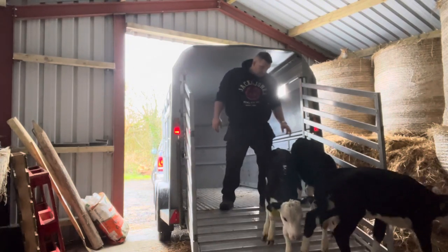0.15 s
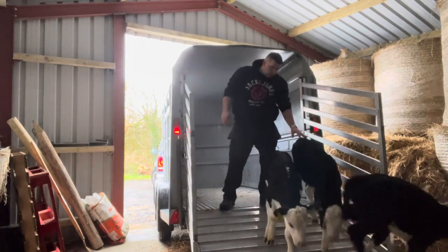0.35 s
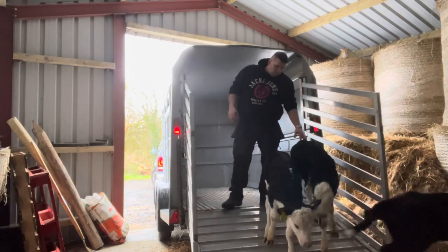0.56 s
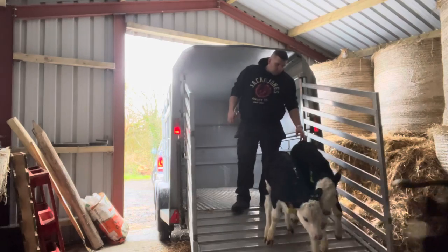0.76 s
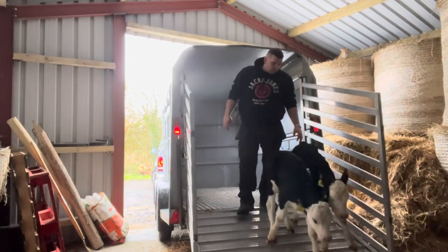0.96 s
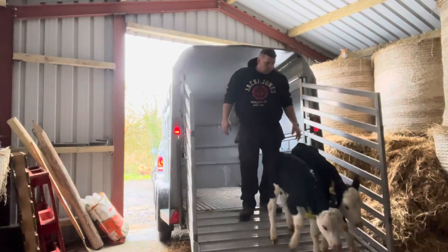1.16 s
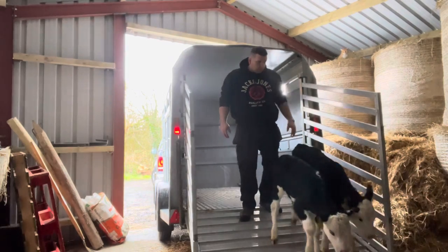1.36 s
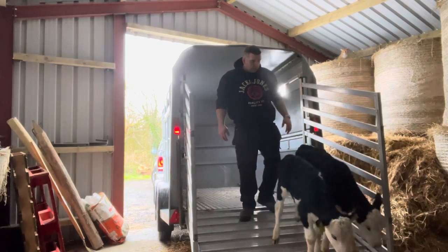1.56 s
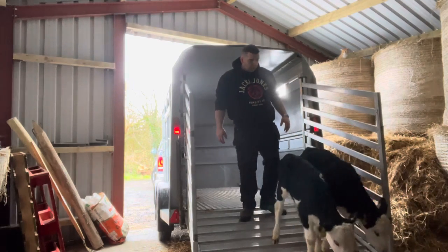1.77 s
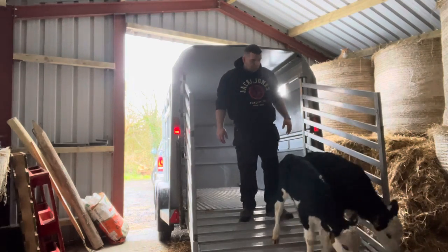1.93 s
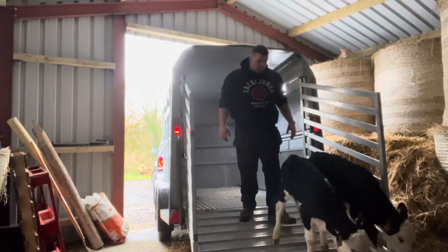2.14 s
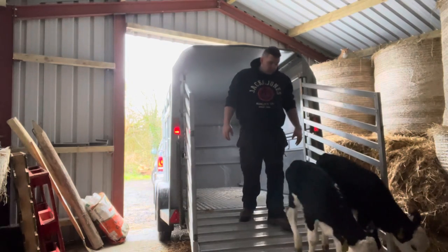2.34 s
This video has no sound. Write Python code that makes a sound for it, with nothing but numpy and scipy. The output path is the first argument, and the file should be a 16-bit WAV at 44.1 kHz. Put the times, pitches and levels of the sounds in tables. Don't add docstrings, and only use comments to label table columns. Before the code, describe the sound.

Close up in a barn, calf hooves knock and rattle loose sheet metal over booming floor thuds, with small metallic squeaks; the steps thin out, a small bird trills, then a sharp blow and lighter knocks follow.

```python
import sys
import numpy as np
from scipy import signal
from scipy.fft import rfft, irfft, next_fast_len
from scipy.io import wavfile
from scipy.ndimage import map_coordinates

SR = 44100
rng = np.random.default_rng(int(sys.argv[2]) if len(sys.argv) > 2 else 0)


def unload_wav(signal):
    wavfile.write(
        sys.argv[1],
        SR,
        np.round(np.clip(np.atleast_2d(signal).T, -1, 1) * 32767).astype(np.int16),
    )


def ratio(d):
    e = np.asarray(d, float) / 20
    return 10 ** e


N = 110250


def unit(x):
    return x / np.sqrt(np.mean(x ** 2) + 1e-20)


def along(points, hz):
    point_hz, value = np.transpose(points)
    return np.interp(np.log(hz + 1), np.log(point_hz + 1), value)


def filtered(x, response):
    size = next_fast_len(x.shape[-1] + 4096)
    spectrum = rfft(x, size) * response(np.fft.rfftfreq(size, 1 / SR))
    return irfft(spectrum, size)[..., :x.shape[-1]]


def noise(count):
    return rng.standard_normal((2, count))


def add(track, s, sound):
    part = track[:, round(s * SR):][:, :sound.shape[-1]]
    part += sound[..., :part.shape[1]]


def wobble(rate, count=N):
    knots = rng.standard_normal(int(count * rate / SR) + 4)
    return map_coordinates(knots, [np.arange(count) * rate / SR])


def dying(t60_of, gain_of_hz, count=SR // 2):
    hz, t, z = signal.stft(noise(count), SR, nperseg=256)
    decay = ratio(-60 * t / np.maximum(t60_of(hz), .01)[:, None])
    gain = unit(gain_of_hz(hz))[:, None] * decay
    return signal.istft(z * gain, SR, nperseg=256)[1][:, :count]


def rings(hz, db, t60, t):
    turn = 2 * np.pi * (hz[:, None] * t + rng.random((2, len(hz), 1)))
    return np.sum(ratio(db[:, None] - 60 * t / t60[:, None]) * np.sin(turn), axis=1)


def band(hz, centre_hz, width_hz):
    return 1 / (1 + (2 * (hz - centre_hz) / width_hz) ** 2)


def background():
    # start_s, level_db
    stir = [
        (0, -12),
        (.15, -9),
        (.4, 5),
        (1.201, 3),
        (1.7, 4.5),
        (1.948, 6.5),
        (2.248, 2.5),
        (2.398, -20.5),
        (2.5, 6),
    ]
    # pitch_hz, level_db
    chassis = [(20, -30), (35, -12), (73, 0), (100, -14), (135, -8), (200, -40)]
    # pitch_hz, level_db
    straw = [(1500, -0.5), (3000, -6), (6000, -9), (11500, -13.5), (14000, -50)]
    # pitch_hz, level_db
    air = [(30, -16.5), (290, 2), (1000, -7), (4000, -34.5), (7400, -21), (8300, -2), (11000, -22),
           (13300, -30)]
    stir_db = np.interp(np.arange(N) / SR, *np.transpose(stir))

    def hiss(points):
        return unit(filtered(noise(N), lambda f: ratio(along(points, f))))

    grain_db = wobble(30) + 2 * wobble(300)
    rustle = hiss(straw) * ratio(-55 + 0.73 * stir_db + grain_db)
    rumble = hiss(chassis) * ratio(-46.5 + stir_db)
    return rumble + rustle + ratio(-54) * hiss(air)


def bird():
    # start_s, length_s, from_hz, to_hz, level_db
    notes_sung = [
        (1.403, .012, 4200, 4450, -53),
        (1.372, .025, 2950, 3300, -55),
        (1.536, .022, 3100, 3800, -51),
        (1.552, .01, 4100, 4600, -58),
        (1.63, .065, 3350, 3750, -53),
        (1.64, .04, 4000, 4400, -59),
        (1.67, .045, 4450, 4200, -59),
        (1.69, .05, 3750, 3100, -52),
        (1.715, .075, 3400, 2300, -46),
        (1.748, .025, 4650, 4300, -59),
    ]
    trill_hz = 188
    out = np.zeros((1, N))
    for s, length, from_hz, to_hz, db in notes_sung:
        t = np.arange(round(length * SR)) / SR
        pitch = from_hz + (to_hz - from_hz) * t / length
        tone = np.sin(2 * np.pi * np.cumsum(pitch) / SR)
        chop = np.cos(np.pi * trill_hz * t) ** 2 if length > .045 else 1
        swell = 2 * np.sqrt(np.sin(np.pi * t / length))
        add(out, s, ratio(db) * swell * chop * tone * (1 + .5 * wobble(700, count=len(t))))
    return out


def scuffs():
    # start_s, length_s, level_db
    slides = [
        (0.178, 0.036, -51),
        (1.753, 0.053, -36),
        (1.905, 0.048, -35.5),
    ]
    # pitch_hz, level_db
    hiss_colour = [(1500, -1.5), (4000, -12), (8000, 0.5), (11500, 2), (14500, -2.5)]
    # pitch_hz, width_hz, level_db
    squeal = [(5500, 530, -17), (11550, 700, -15)]
    squeal_s, squeal_len_s, squeal_t60_s = .442, .014, .2
    out, t = np.zeros((2, N)), np.arange(SR // 4) / SR
    for s, length, db in slides:
        hiss = unit(filtered(noise(len(t)), lambda f: ratio(along(hiss_colour, f))))
        add(out, s, ratio(db) * hiss * np.sin(np.pi * np.minimum(t / length, 1) ** 0.47))
    ring_on = 0.32 * ratio(-60 * t / squeal_t60_s)
    held = np.minimum(t / 0.0016, 1) * np.where(t < squeal_len_s, 1, ring_on)
    for hz, width_hz, db in squeal:
        shriek = unit(filtered(noise(len(t)), lambda f: band(f, hz, width_hz)))
        add(out, squeal_s, ratio(db) * held * shriek)
    return out


def clinks():
    # start_s, peak_db, pitch_hz
    pin = [(0.4519, -11, 3590), (0.5816, -22, 4030), (0.6502, -15.5, 4500), (0.7517, -16.5, 4230),
           (0.83, -12.5, 4350), (0.8874, -19, 3744), (0.901, -19, 4270), (0.761, -27, 4480),
           (0.9611, -13, 4160), (1.0336, -26, 3950), (1.0983, -19.5, 4470), (1.1862, -23, 4210)]
    skid_s, glide, roughness = .009, .16, .8
    out, t = np.zeros((2, N)), np.arange(SR // 10) / SR
    u = t / skid_s
    swell = 7 * u * np.exp(-3 * u)
    for s, db, hz in pin:
        pitch = hz * (1 + glide * (np.minimum(u, 1.5) - .4))
        rough = 1 + roughness * np.array([wobble(1400, count=len(t)), wobble(1400, count=len(t))])
        squeak = np.sin(2 * np.pi * np.cumsum(pitch) / SR)
        add(out, s - .004, ratio(db - 4) * swell * rough * squeak)
    return out


def thuds():
    # start_s, peak_db, pitch_hz, t60_s
    landings = [(0.142, -31, 433, 0.86), (0.19, -21, 406.6, 0.34), (0.213, -23, 378, 0.16),
                (0.232, -22.5, 275, 0.19), (0.271, -15, 394, 0.13), (0.283, -20.5, 261.5, 0.26),
                (0.335, -12.5, 395, 0.22), (0.407, -6.5, 176.2, 0.18), (0.407, -7, 272, 0.087),
                (0.464, -11, 367, 0.22), (0.466, -15, 709, 0.26), (0.47, -14, 127, 0.15),
                (0.482, -8.5, 438, 0.1), (0.482, -15, 1021, 0.16), (0.501, -12, 432, 0.18),
                (0.525, -20.5, 454, 0.15), (0.56, -17.5, 378, 0.27), (0.598, -17.5, 404.5, 0.16),
                (0.635, -19, 308, 0.23), (0.736, -8, 302, 0.085), (0.748, -9.5, 414.3, 0.15),
                (0.756, -13, 191.5, 0.22), (0.79, -20.5, 387.5, 0.22), (0.845, -16, 331, 0.32),
                (0.858, -27.5, 193, 0.18), (0.882, -3.5, 301, 0.05), (0.893, -17.5, 400, 0.045),
                (0.967, -25.5, 286.4, 0.98), (1.215, -23, 433, 0.34), (1.25, -16, 242, 0.11),
                (1.297, -22.5, 265.7, 0.42), (1.385, -17, 123, 0.14), (1.41, -17.5, 133, 0.19),
                (1.521, -12.5, 270, 0.15), (1.575, -26, 291, 0.29), (1.6, -39, 608.7, 0.86),
                (1.775, -38, 615, 0.5), (1.894, -27.5, 254, 0.32), (1.991, -10.5, 531, 0.12),
                (2.019, -11.5, 491, 0.1), (2.045, -21, 874, 0.08), (2.077, -24.5, 645, 0.085),
                (2.133, -23.5, 402, 0.16), (2.191, -18, 416, 0.12), (2.215, -19.5, 391, 0.15),
                (2.27, -22.5, 407, 0.14), (2.315, -29.5, 392, 0.24), (2.476, -30.5, 364, 0.3),
                (0.705, -29, 74, 0.25),
        (1.5, -28, 76, 0.2),
        (1.61, -27, 74, 0.4),
        (1.93, -31, 62, 0.3),
        (2.198, -20, 175, 0.2),
        (2.228, -20, 158, 0.25),
        (2.275, -25, 190, 0.15),
    ]
    rise_s, sag, waver_db, neighbour_q = 0.00485, 0.036, 2.5, 3
    out, t = np.zeros((2, N)), np.arange(SR // 2) / SR
    rise = 1 - np.exp(-t / rise_s)
    for s, db, hz, t60 in landings:
        def boom_colour(f):
            neighbours = band(f, hz, hz / neighbour_q) * (f > hz / 2)
            puff = ratio(-9.5) * (f > 110) * (f < 520)
            return neighbours + puff

        boom = unit(filtered(noise(len(t)), boom_colour))
        waver = ratio(waver_db * wobble(60, count=len(t)))
        mode = np.sin(2 * np.pi * hz * t * (1 - sag * t / t60)) * waver
        boom_gain = ratio(-3.5 + .4 * (db + 15))
        add(out, s - rise_s, ratio(db - 3 - 60 * t / t60) * rise * (boom_gain * boom + mode))
    return out


def raps():
    # start_s, peak_db
    blows = [
        (0.263, -8),
        (0.33, -4.5),
        (1.9755, -19),
        (1.983, 5.5),
        (2.183, -12.5),
        (2.467, -17.5),
    ]
    # pitch_hz, level_db, t60_s
    beam_modes = [(603, -7, 0.065), (692, -7, 0.041), (851, 0.5, 0.048), (1099, -3.5, 0.058),
                  (1186, -0.5, 0.026), (1440, -10.5, 0.028), (2328, -10.5, 0.04)]
    snap_t60_s = 0.018
    out, t = np.zeros((2, N)), np.arange(SR // 4) / SR
    hz, level, t60 = np.transpose(beam_modes + beam_modes + beam_modes)
    for s, db in blows:
        detuned_hz = hz * (1 + 0.037 * rng.standard_normal(len(hz)))
        beam = rings(detuned_hz, level + 2 * rng.standard_normal(len(hz)), t60, t)
        snap = unit(filtered(noise(len(t)), lambda f: (f > 400) * 1000 / (f + 900)))
        snap = ratio(-60 * t / snap_t60_s) * snap
        add(out, s - .002, ratio(db - 13.5) * np.minimum(t / 0.0028, 1) * (beam + snap))
    return out


def knocks():
    # start_s, peak_db, brightness_db_per_octave, t60_s
    hooves = [(0.138, -34, -4.5, 1), (0.2, -35.5, 6.5, 0.34), (0.26, -24.5, 5.5, 0.21),
              (0.328, -22, 4.5, 0.38), (0.381, -14, 3, 0.75), (0.387, -14, -0.5, 0.74),
              (0.455, -6, 5.5, 0.14), (0.575, -36.5, 6, 0.49), (0.643, -13.5, 1.5, 0.42),
              (0.734, -15, 0, 0.37), (0.818, -10, -1, 0.55), (0.882, -14, -0.5, 0.45),
              (0.952, -10.5, 0.5, 0.42), (1.027, -10.5, -2, 0.41), (1.089, -16.5, -1.5, 0.64),
              (1.176, -10, -1.5, 0.45), (1.371, -18.5, -10, 0.33), (1.487, -21.5, -11, 0.47),
              (1.538, -23, -8, 0.4), (1.82, -30, -10.5, 0.47), (1.889, -25, -8, 0.39),
              (1.982, -18, -1, 0.44), (2.183, -21.5, -5, 0.27), (2.468, -28, -1.5, 0.29)]
    # pitch_hz, level_db
    sheet_colour = [(300, 4.5), (1100, -3.5), (1900, -12.5), (2350, -14), (3200, -23.5), (4300, -32),
                    (7500, -42.5), (13300, -58)]
    # pitch_hz, share_of_t60
    sheet_decay = [(300, 0.76), (1000, 1), (4000, 0.59), (12000, 0.4)]
    # pitch_hz, level_db, t60_s
    panel_modes = [(433, -10, 0.91), (615, -7, 0.41), (704.3, -7, 0.29), (856.4, 8.5, 0.066),
                   (957, -3, 0.15), (1130, -25.5, 0.13), (1524, -5, 0.38), (980, -9, 0.26),
                   (1220, -3.5, 0.18), (1798, -9, 0.3), (2380, -22.5, 0.36), (2870, -13, 0.24)]
    out, t = np.zeros((2, N)), np.arange(SR // 2) / SR
    hz, level, ring = np.transpose(panel_modes)
    for s, db, bright, t60 in hooves:
        def streaks(f):
            octaves = np.log2(np.clip(f, 500, 9000) / 1000)
            colour = ratio(along(sheet_colour, f) + (bright + 9.5) * octaves)
            return colour * ratio(2.2 * rng.standard_normal(len(f)))

        sheet = dying(lambda f: t60 * along(sheet_decay, f), streaks)
        sheet = sheet / np.std(filtered(sheet[:, :600], lambda f: (f > 700) & (f < 3000)))
        rattle = ratio(1.5 * wobble(256.0, count=len(t)))
        panel = rings(hz, level + 3 * rng.standard_normal(len(hz)), ring, t)
        rise_s = .004 * ratio(-bright)
        rise = 1 - np.exp(-t / rise_s)
        add(out, s - rise_s / 2, ratio(db) * rise * (ratio(-9.5) * sheet * rattle + ratio(-17) * panel))
    return out


def shed(x):
    # pitch_hz, t60_s
    shed_t60 = [(100, 1), (1000, 0.41), (6000, 0.36), (13000, 0.24)]
    out, step = np.zeros((2, N)), SR // 4
    for start in range(0, N, step):
        tail = dying(lambda f: along(shed_t60, f), lambda f: f / (f + 500) / (1 + f / 4000))
        tail /= np.linalg.norm(tail[0])
        add(out, start / SR + .012, signal.fftconvolve(x[:, start:start + step], tail, axes=1))
    return out


def scene():
    near = bird() * [[1], [0]] + scuffs() + clinks() + thuds() + raps() + knocks()
    return near + ratio(-11) * shed(near) + background()


def low_pass(x):
    return signal.sosfilt(signal.butter(12, 13420, fs=SR, output="sos"), x)


def record(dry):
    # pitch_hz, correlation
    alike = [(600, 1), (1200, .78), (2200, .4), (4000, .45), (6000, .7), (8000, .9)]
    # pitch_hz, lead_rad
    lead = [(700, 0), (1300, -.9), (1900, -2.2), (4100, -5.8), (6100, -12), (8400, -9.6), (9500, -9.3),
            (11000, -6.4), (13500, -3.8)]
    # pitch_hz, level_db
    tilt = [(500, -1), (1200, -2), (2500, -3), (5000, -4.5), (8000, 2.5), (12000, -1.5)]
    # from_hz, to_hz
    faint_bands = [(8450, 9400), (11100, 12300)]
    mono_below_hz, low_cut_hz, top_hz, round_level = 700, 45, 13450, 1.2

    def likeness(f):
        turn = np.arccos(np.clip(along(alike, f), -1, 1)) / 2
        return np.array([np.cos(turn), np.sin(turn)])

    def port_balance(f):
        half = ratio(along(tilt, f) / 2) * np.exp(.5j * along(lead, f))
        return np.array([half, 1 / half])

    def kept(f, edges):
        return np.where((f > edges[0]) & (f < edges[1]), .08, 1)

    def side_response(f):
        return kept(f, faint_bands[1]) / (1 + (mono_below_hz / (f + 1)) ** 8)

    def middle_response(f):
        low_cut = 1 + (low_cut_hz / (f + 1)) ** 2
        return kept(f, faint_bands[0]) * kept(f, (top_hz, SR)) / low_cut

    same, other = filtered(dry, likeness)
    left, right = filtered(np.array([same + other, same - other]), port_balance)
    side = filtered((left - right) / 2, side_response)
    x = filtered((left + right) / 2, middle_response) + np.array([side, -side])
    return low_pass(x / (1 + abs(x / round_level) ** 4) ** 0.097)


dry = scene()
out = record(dry)
unload_wav(out)
```